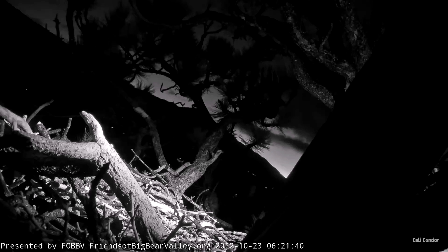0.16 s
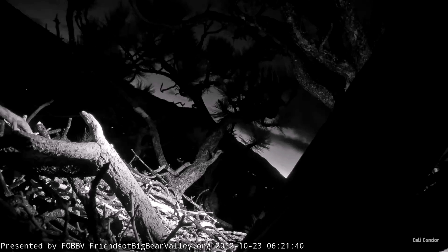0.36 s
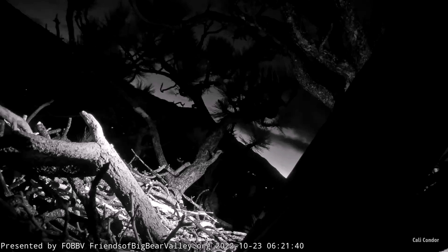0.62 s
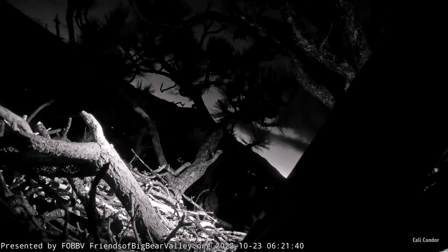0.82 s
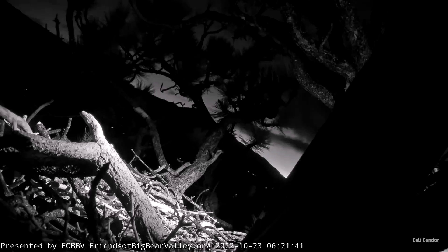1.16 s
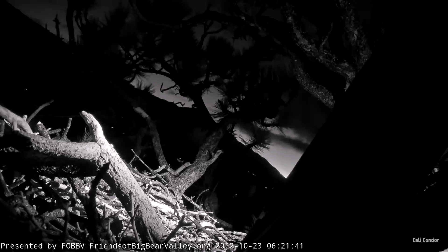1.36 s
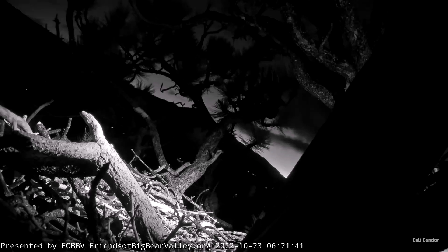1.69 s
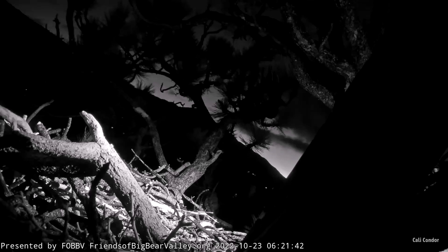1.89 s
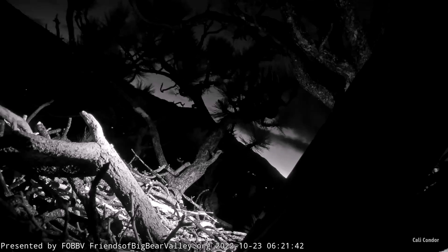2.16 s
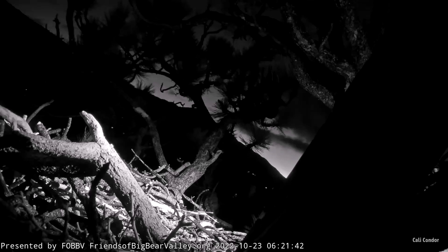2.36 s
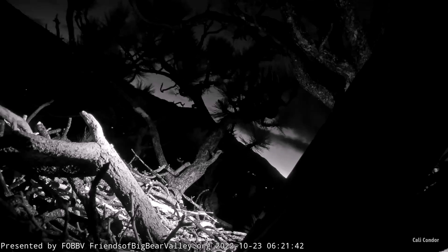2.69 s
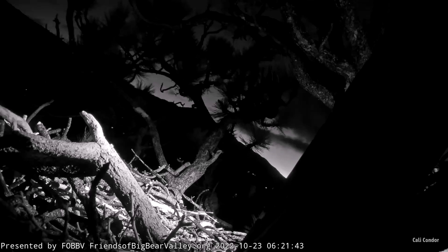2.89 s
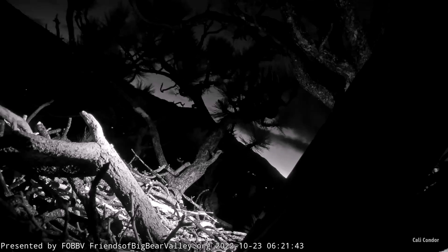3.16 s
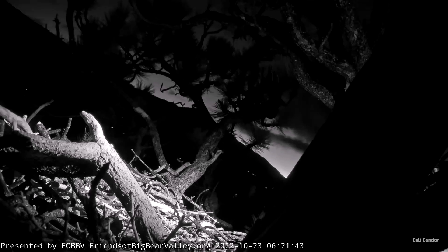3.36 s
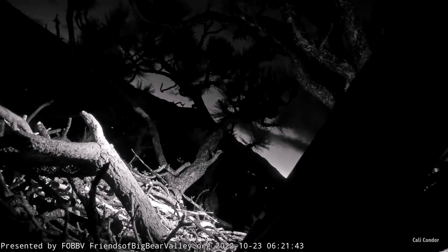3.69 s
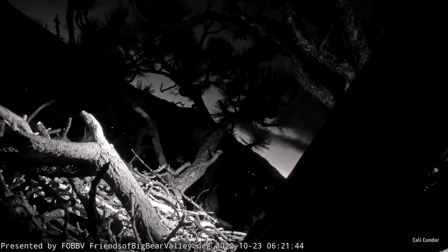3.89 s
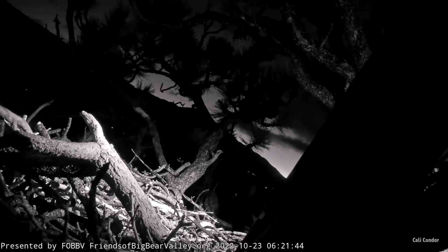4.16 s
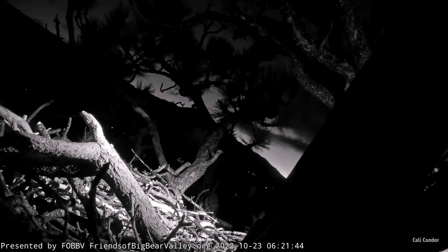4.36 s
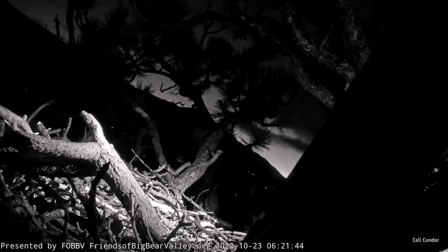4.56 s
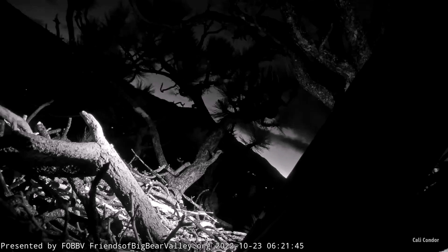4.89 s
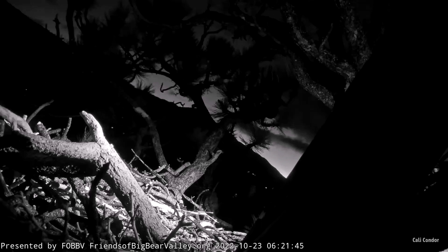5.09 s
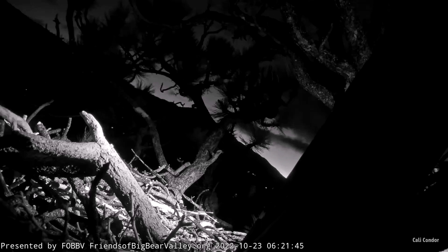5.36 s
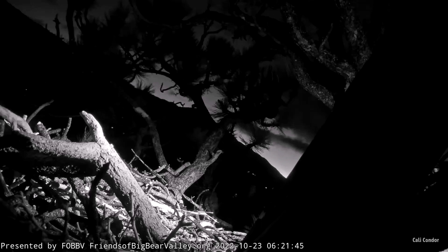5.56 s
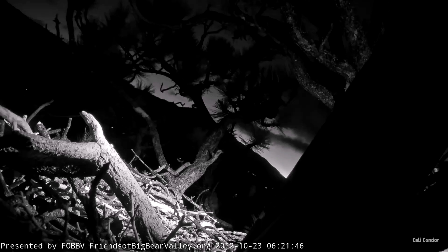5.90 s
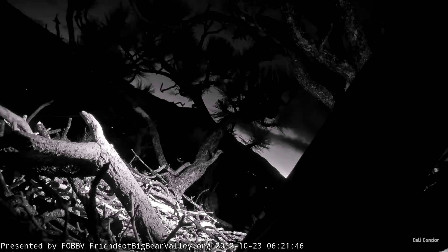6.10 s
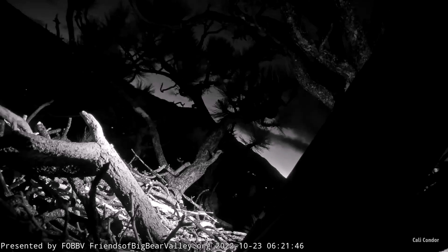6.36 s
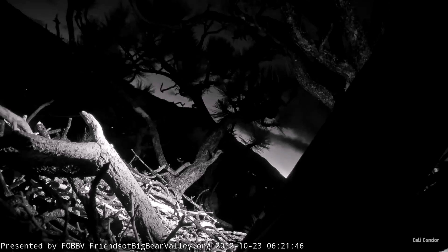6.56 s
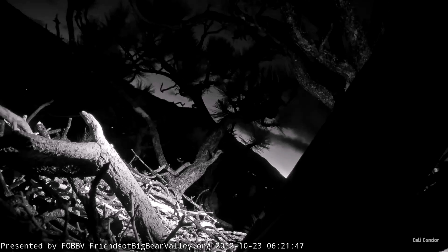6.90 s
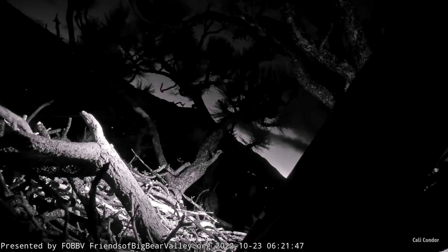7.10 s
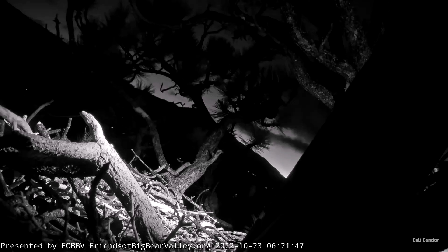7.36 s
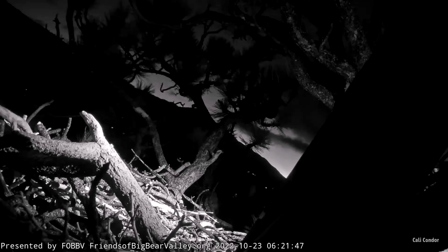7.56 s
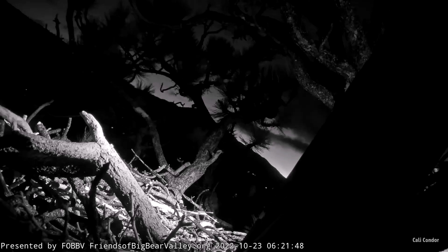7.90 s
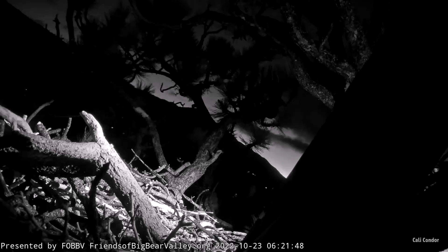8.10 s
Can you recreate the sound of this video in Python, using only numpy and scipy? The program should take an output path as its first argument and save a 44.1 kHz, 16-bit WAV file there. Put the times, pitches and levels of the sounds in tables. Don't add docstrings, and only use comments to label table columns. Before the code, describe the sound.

Several songbirds whistle and chip with long forest echoes over a low steady wind rumble, a faint distant motor hum and tiny close twig ticks.

```python
import sys
import numpy as np
from scipy import signal
from scipy.fft import rfft, irfft, next_fast_len
from scipy.io import wavfile
from scipy.ndimage import map_coordinates

SR = 44100
rng = np.random.default_rng(int(sys.argv[2]) if len(sys.argv) > 2 else 0)


def master(y):
    cut = np.clip(np.atleast_2d(y).T, -1, 1)
    pcm = np.round(cut * 32767)
    wavfile.write(sys.argv[1], SR, pcm.astype(np.int16))


def ratio(d):
    e = np.asarray(d, float) / 20
    return 10 ** e


N = 363825


def unit(x):
    return x / np.sqrt(np.mean(x ** 2) + 1e-20)


def with_energy(x, energy):
    return x * energy / np.linalg.norm(x)


def curve(rows):
    s, values = np.transpose(rows)
    return np.interp(np.arange(N) / SR, s, values)


def wobble(rate):
    points = rng.standard_normal(int(N * rate / SR) + 4)
    return map_coordinates(points, [np.arange(N) * rate / SR])


def coloured(x, spectrum):
    size = next_fast_len(N + 8192)
    hz, db = np.transpose(spectrum)
    grid = np.log(np.fft.rfftfreq(size, 1 / SR) + 1)
    gain = ratio(np.interp(grid, np.log(hz + 1), db))
    return irfft(rfft(x, size) * gain, size)[:N]


def noise(spectrum):
    return unit(coloured(rng.standard_normal(N), spectrum))


def gusts():
    # t/s, level/dB
    wind = [(0, 4), (.2, 1.5), (1.8, -0.2), (2.9, 0.7), (3.3, -0.9), (4.6, 1.1), (5.4, -1), (6.15, 1),
            (6.5, -1), (7.3, 1.2), (8.25, -1.5)]
    return curve(wind)


def wind_rumble(gust_db):
    # f/Hz, level/dB
    rumble = [(5.9, -27), (10, -7.5), (49, 2.5), (86, -2.5), (112, -3.5), (163, -10), (300, -23.5),
              (600, -120)]
    return ratio(-37 + gust_db + 1.17 * wobble(6)) * noise(rumble)


def far_motor():
    # t/s, level/dB
    motor = [(0, -63), (.16, -38), (1.06, -36.5), (1.65, -40.5), (1.81, -44.5), (2.5, -39.5), (2.9, -55),
             (3.63, -38), (4.62, -60), (5.01, -41), (5.33, -50), (5.77, -39), (6.27, -48), (6.48, -37.5),
             (6.6, -42.5), (7.75, -43.5), (7.93, -35), (8.25, -46)]
    phase = 2 * np.pi * np.cumsum(111 + 3.45 * wobble(14)) / SR
    return ratio(curve(motor) + 0.45 * wobble(15)) * np.sin(phase)


def treetop_rush(gust_db):
    # f/Hz, level/dB
    rush = [(120, -9), (200, -2.5), (322, -5), (626, -10), (2280, -27), (4000, -33.5), (5200, -91),
            (8800, -120)]
    return ratio(-49.5 + 0.053 * gust_db + 0.053 * wobble(2.6)) * noise(rush)


def cracks(events, colour, t60):
    out = np.zeros(N + SR)
    t = np.arange(SR // 20) / SR
    bursts = rng.standard_normal((len(events), len(t)))
    for (s, db), burst in zip(events, bursts):
        out[round(s * SR):][:len(t)] += ratio(db - 60 * t / t60) * burst
    return coloured(out[:N], colour)


def twig_ticks():
    # t/s, peak level/dB
    ticks = [(0.1226, -34), (0.211, -30), (0.4783, -33), (1.3101, -29), (2.8943, -34), (4.6773, -29),
             (5.824, -27), (5.8701, -30.5), (6.7785, -26.5), (6.8199, -34), (6.8516, -32), (7.2265, -32.5),
             (7.3178, -24.5), (7.342, -34), (7.423, -36), (7.7134, -32.5), (8.1088, -28.5), (8.178, -37)]
    # f/Hz, level/dB
    twig = [(1000, -45), (5000, -26), (7200, -9.5), (9000, -6.5), (13500, -4), (14500, -21), (16000, -20)]
    return cracks(ticks, twig, t60=0.0062)


def birds(notes, bend, overtone_db, branches_db):
    t = np.arange(3 * SR // 2) / SR
    out = np.zeros(N + 3 * SR)
    scatters = rng.standard_normal((len(notes), len(t)))
    clumps = rng.standard_normal((len(notes), 20))
    quavers = rng.standard_normal((len(notes), 2, 12))
    branches = with_energy(ratio(-60 * t[:SR // 10] / .08), ratio(branches_db))
    for note, scatter, clump, quaver in zip(notes, scatters, clumps, quavers):
        s, length, from_hz, to_hz, db, echo_db = note
        u = np.arange(round(length * SR)) / (length * SR)

        beats = 85 * length * u
        waver, flutter = (map_coordinates(knots, [beats]) for knots in quaver)
        pitch = (from_hz + (to_hz - from_hz) * u ** bend) * (1 + .005 * waver)
        phase = 2 * np.pi * np.cumsum(pitch) / SR
        breath = ratio(2.0 * flutter) * np.sin(np.pi * u ** .8) ** .9
        tone = breath * np.sin(phase)
        overtone = breath * ratio(overtone_db) * np.sin(2 * phase)

        near = signal.fftconvolve(tone + overtone, branches * scatter[-len(branches):])
        near[:len(u)] += tone + overtone

        t60 = 2.83 * (2700 / from_hz) ** 0.83
        stands_db = 0.32 * np.interp(t, np.linspace(0, t[-1], len(clump)), clump)
        forest = ratio(stands_db - 60 * t / t60) * (1 - np.exp(-t / 0.0026))
        far = signal.fftconvolve(tone + 0.59 * overtone, scatter * forest)

        energy = ratio(db - 1.1) * np.sqrt(len(u))
        out[round(s * SR):][:len(near)] += with_energy(near, energy)
        out[round(s * SR):][:len(far)] += with_energy(far, energy * ratio(echo_db - 0.8))
    return out[:N]


def slid(rows, percent=0, climb_hz=0):
    return [(s, length, hz, hz * (1 + percent / 100) + climb_hz, db, echo_db)
            for s, length, hz, db, echo_db in rows]


def sliding_notes():
    # t/s, length/s, start f/Hz, level/dB, echo/dB
    swoops = [(.272, 0.026, 1660, -48, -1), (.525, 0.037, 3320, -54.5, 2), (.66, .03, 3400, -59.5, 10),
              (.93, .013, 4050, -64, 18), (.985, 0.034, 3270, -52.5, 6.5), (5.487, 0.037, 2414, -44, 1),
              (6.228, .03, 4200, -43, -0.5), (6.084, 0.0374, 2428, -41, 0), (6.215, 0.0073, 3670, -49.5, 1),
              (6.645, 0.045, 4220, -55, 1), (6.78, 0.022, 4090, -49.5, 3.5)]
    lifts = [(.275, .025, 1214, -55.5, -9), (6.897, 0.016, 4900, -62, -10), (.82, 0.034, 3330, -56, 3),
             (2.715, 0.036, 4040, -60, -16), (4.999, 0.035, 3886, -38.5, -3), (5.565, 0.034, 3140, -49, 8),
             (6.25, 0.014, 2550, -43, -7), (6.31, .032, 2634, -51, -6), (6.765, 0.031, 3360, -46.5, -8)]
    peeps = [(1.375, 0.016, 1398, -52, -4), (2.745, 0.024, 4190, -48.5, 5), (5.115, 0.052, 3910, -53, -11),
             (5.3, 0.106, 3950, -58, -20), (6.085, .026, 4680, -65, 1), (6.465, .013, 5440, -56, 0),
             (6.685, 0.022, 4180, -52, 0), (7.228, 0.016, 1770, -51.5, 0), (7.548, 0.017, 1283, -53, -10)]
    dips = [(1.26, 0.017, 1456, -58, -17), (2.772, 0.0074, 4190, -44.5, 6), (3.26, 0.056, 4130, -58.5, -10),
            (3.915, 0.0069, 1245, -53, -10), (4.05, .012, 2500, -60, -17), (5.04, 0.062, 4050, -56, -14),
            (5.51, 0.0081, 3220, -45, 5), (6.562, .037, 4400, -52, -13), (6.655, 0.033, 5200, -62, -8),
            (6.78, .015, 5460, -56, -3), (6.901, 0.014, 3460, -44, -1.5), (7.027, 0.037, 3272, -34.5, -6),
            (7.305, 0.031, 2930, -62, 18), (7.64, 0.014, 3690, -69, 18)]
    dives = [
        (1.548, 0.017, 1752, -44, 2.5),
        (2.183, 0.019, 1100, -50.5, -19.5),
        (7.77, 0.0288, 3640, -59, 7),
    ]
    slides = slid(swoops, climb_hz=333)
    slides += slid(lifts, 5.1) + slid(peeps, -0.7) + slid(dips, -5) + slid(dives, -12.5)
    return birds(slides, bend=1.1, overtone_db=-36, branches_db=-5)


def phrase(rows, percent):
    notes = []
    for k, row in enumerate(rows):
        slip = percent + (-15 - percent) * .65 ** k
        notes += slid([row], slip)
    return notes


def held_whistles():
    # t/s, length/s, held f/Hz, level/dB, echo/dB
    lead_ins = [
        (.288, 0.032, 2693, -42, -15),
        (.614, 0.0216, 4020, -44.5, 7),
    ]
    low_song = [(.322, .045, 2710, -39.5, 1), (.408, 0.074, 2748, -46, 4.5), (.527, 0.049, 2734, -39.5, 5),
                (.662, 0.048, 2707, -39.5, -7), (.826, 0.0434, 2686, -38.5, -1),
                (.977, 0.093, 2690, -44.5, -0.5)]
    high_song = [(.648, 0.035, 3983, -42, -4), (2.82, 0.057, 4184, -51, 3.5),
                 (2.895, 0.05, 4190, -56.5, -3), (6.128, 0.058, 3360, -44.5, -1.5),
                 (6.405, 0.026, 3346, -52, 2), (7.166, 0.03, 3146, -44.5, -2)]
    late_song = [(1.24, .025, 3174, -43.5, -1), (1.355, 0.048, 3130, -56, 0),
                 (1.521, 0.036, 1780, -42, -6.5), (3.13, 0.035, 4214, -54, 2.5),
                 (7.66, 0.089, 2810, -48.5, 6.5), (7.755, 0.047, 2807, -44, -5),
                 (7.85, 0.059, 2800, -49, -1.5), (7.92, 0.057, 2890, -48, -1.5),
                 (7.915, 0.047, 2165, -48.5, 3), (8.0, 0.04, 3950, -58, 3.5)]
    held = phrase(low_song, -8) + slid(lead_ins, 4) + slid(high_song, -1.6) + slid(late_song, -5.2)
    return birds(held, bend=4.0, overtone_db=-32, branches_db=-5)


def plunged(rows, length, foot_hz):
    return [(s, length, hz, foot_hz, db, echo_db) for s, hz, db, echo_db in rows]


def dry_chips():
    # t/s, top f/Hz, level/dB, echo/dB
    low_chips = [(2.812, 3600, -55, -4), (2.906, 3770, -58, -8), (3.008, 3700, -59, -6),
                 (3.114, 3740, -53, -2), (3.132, 3650, -52, 3), (3.375, 3350, -54, -8),
                 (3.485, 3240, -52, -2), (4.567, 3930, -47, -14), (4.573, 4040, -48, 0),
                 (4.587, 3970, -53, -7), (4.655, 4100, -57, 0), (4.683, 3600, -57, -7),
                 (6.327, 5300, -50, -6), (6.427, 5730, -51, -6), (6.53, 5020, -49, 3),
                 (8.0, 3770, -42.5, -1)]
    high_chips = [(3.368, 4190, -46.5, 6.5), (3.487, 4160, -47.5, 6), (3.625, 3980, -54, 5),
                  (3.755, 3930, -54, 3), (4.67, 4270, -54.5, -5), (6.906, 4370, -52, 9),
                  (7.716, 4205, -55, -4)]
    chips = plunged(low_chips, length=.0053, foot_hz=3170) + plunged(high_chips, length=.0058, foot_hz=3730)
    return birds(chips, bend=.9, overtone_db=-36, branches_db=-2)


def nest_knocks():
    # t/s, peak level/dB
    snaps = [
        (3.133, -55.5),
        (4.69, -62),
    ]
    # f/Hz, level/dB
    knock = [(400, -20), (1200, 19), (2500, 21), (4500, -14), (8000, -30)]
    return cracks(snaps, knock, t60=0.027)


def lining_shifts():
    # t/s, peak level/dB
    thuds = [
        (5.6, -49),
        (8.14, -48),
    ]
    # f/Hz, level/dB
    lining = [(300, -20), (800, 16), (1400, 7.5), (2000, 2), (3000, -30)]
    return cracks(thuds, lining, t60=0.24)


def reedy_whistler():
    # t/s, length/s, held f/Hz, level/dB, echo/dB
    reedy = [
        (7.246, .1, 2247, -46.5, 4.5),
        (7.33, 0.028, 2900, -54, -4),
        (7.365, 0.0326, 2810, -47.5, 12.5),
        (7.452, 0.06, 2857, -52, 9),
        (7.55, 0.058, 2817, -48.5, 2.5),
    ]
    return birds(phrase(reedy, -4.5), bend=4.0, overtone_db=-14, branches_db=-4)


def scene():
    gust_db = gusts()
    air = wind_rumble(gust_db) + far_motor() + treetop_rush(gust_db)
    wood = twig_ticks() + nest_knocks() + lining_shifts()
    song = sliding_notes() + held_whistles() + dry_chips() + reedy_whistler()
    return (air + wood + song)[None]


def low_pass(x):
    return signal.sosfilt(signal.butter(12, 16000, fs=SR, output="sos"), x)


def record(dry):
    # f/Hz, level/dB
    hiss = [(1500, -2), (3000, -5.5), (5000, -2.5), (8000, -1), (12000, 0), (13700, -1.5), (14000, -17),
            (15700, -18)]
    picked = dry[0] + ratio(-57) * noise(hiss)
    limited = coloured(picked, [(15620, 0), (15660, -80)])
    mix = (limited - .0054)[None]
    return low_pass(mix)


dry = scene()
out = record(dry)
master(out)
```